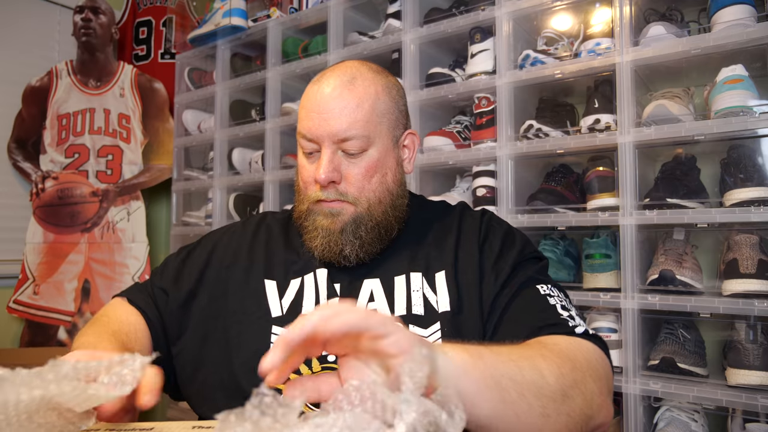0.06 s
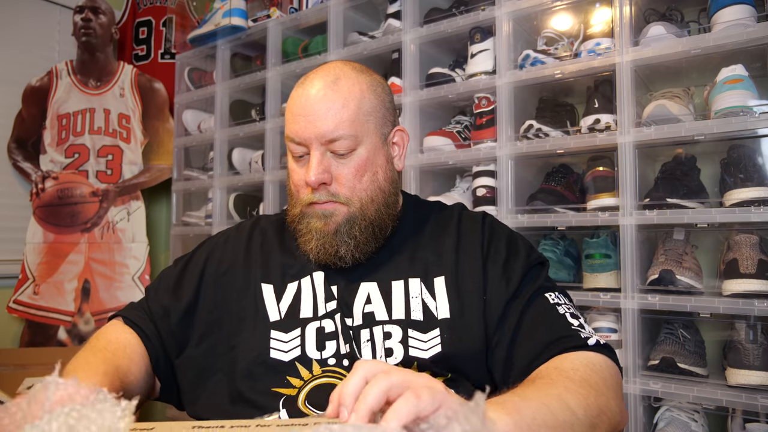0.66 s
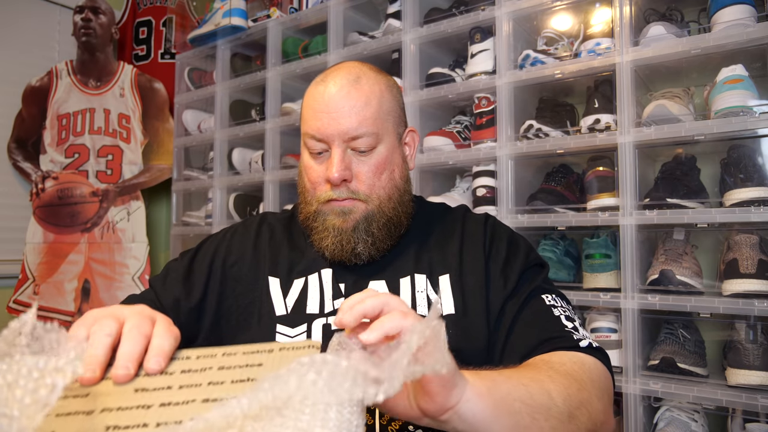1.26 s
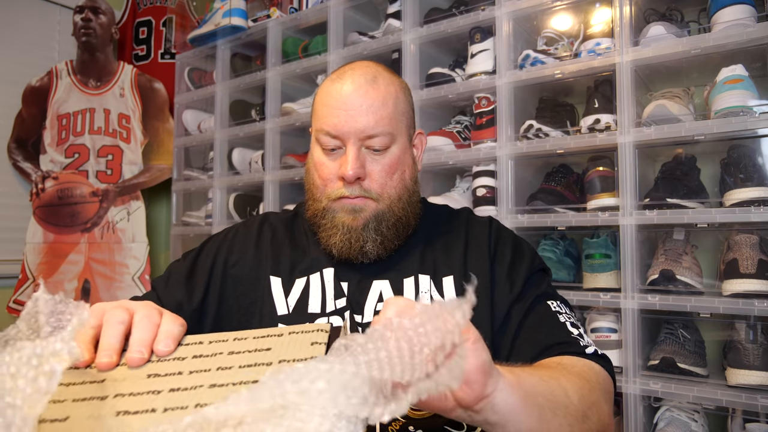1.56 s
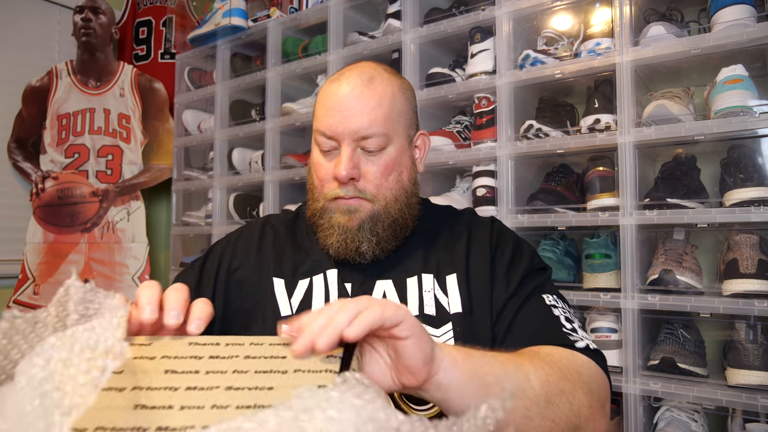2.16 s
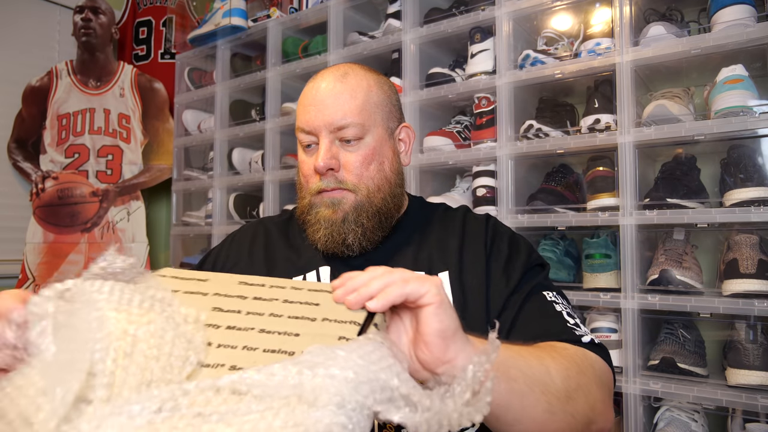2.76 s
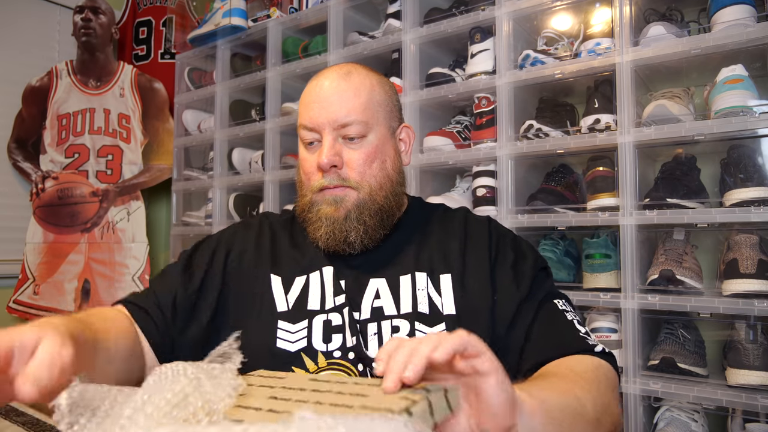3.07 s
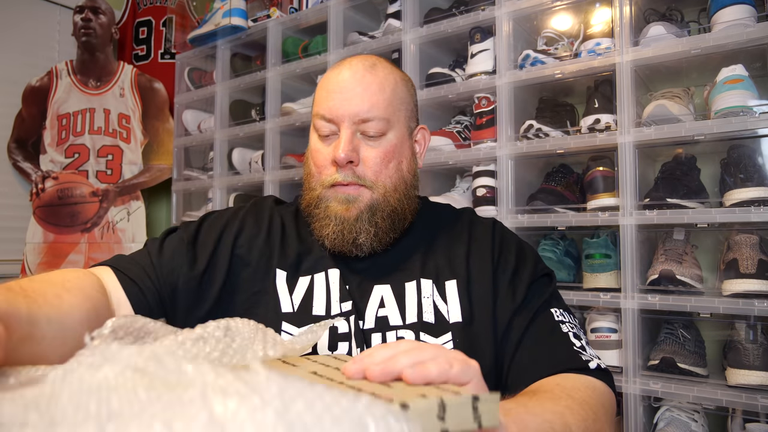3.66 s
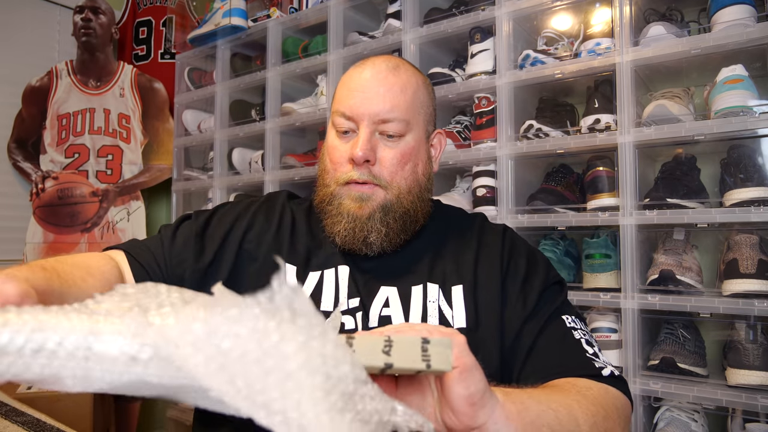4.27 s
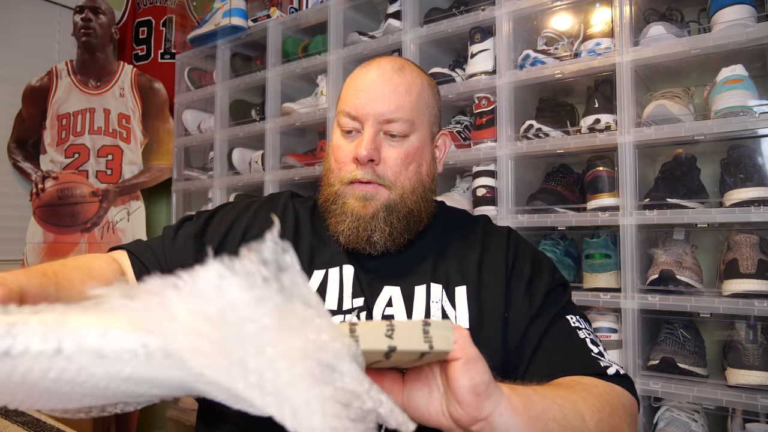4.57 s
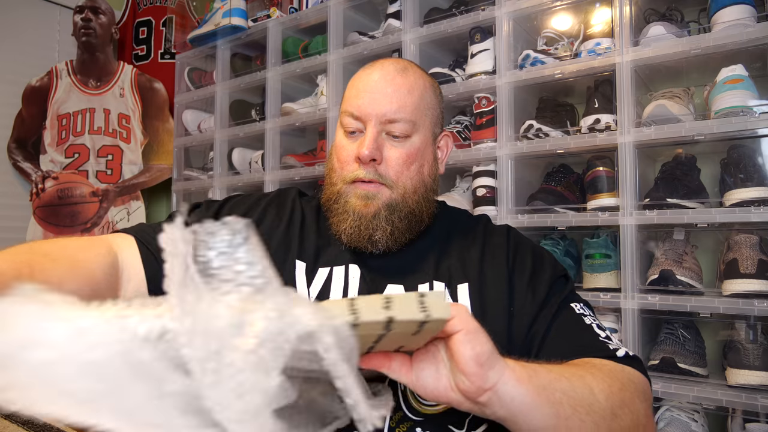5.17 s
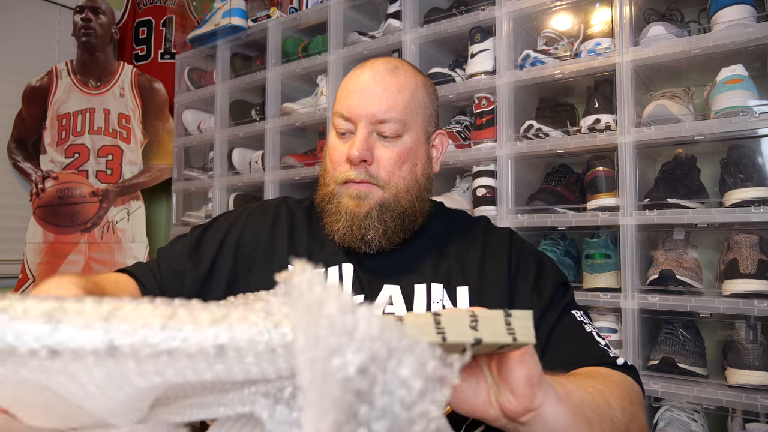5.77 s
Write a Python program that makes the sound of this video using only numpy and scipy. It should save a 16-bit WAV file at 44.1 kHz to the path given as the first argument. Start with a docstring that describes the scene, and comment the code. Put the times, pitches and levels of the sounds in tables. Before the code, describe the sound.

Bubble wrap crackles, swishes and squeaks as it is pulled off a cardboard box, with a few light knocks, close up in a small room.

```python
"""Bubble wrap is pulled off a long parcel and a cardboard box, close up in a small furnished room.
With each pull, tiny buckles and sticking contacts make the film crackle and rustle. It swishes when
tugged, creaks and squeals where it sticks and slips, and snaps where a crease gives way.
The box rings as it is knocked, the parcel thumps the table, and short reflections follow it all."""
import sys
import numpy as np
from scipy import signal
from scipy.fft import rfft, irfft
from scipy.io import wavfile

SR = 44100
rng = np.random.default_rng(int(sys.argv[2]) if len(sys.argv) > 2 else 0)


def file_out(sig):
    """Save sig as 16-bit WAV at sys.argv[1]."""
    # one column per channel
    cols = np.atleast_2d(sig).T
    # limit, then scale
    lim = np.clip(cols, -1, 1)
    pcm = np.round(lim * 32767).astype(np.int16)
    wavfile.write(sys.argv[1], SR, pcm)


N = 265036
TIME = np.arange(N) / SR


def rustle(level, treble, body, rumble_db=-10, clump_db=0.62, clump_hz=45, scrape_share=0.4):
    """Sliding wrap: clumped crackle and scrapes, brighter when fast, fuller when it drags on the box."""
    # The film's tone colour within each band. Each row: frequency in Hz, relative level in dB.
    film_colour = [(20, -10), (45, 1), (81, -0.5), (155, -2.5), (300, 1), (750, -2), (1630, -3), (2840, -5),
                   (3830, -0.5), (4930, -8.5), (7500, -13), (10000, -18), (13000, -18.5), (16000, -19.5)]
    grains = crackle(N, per_s=2200, spread_db=3.0, hiss=0.94)
    grains += scrape_share * scrapes(N, per_s=1500, decay=.0014)
    grains *= gain_of(clump_db * wander(N, clump_hz))
    # the lowest notes belong to the parcel's weight, the highest to the speed of the film
    bands = [(18, 150, body + rumble_db), (150, 850, body), (850, 5500, level), (5500, 16000, treble)]
    out = np.zeros(N)
    for low_hz, high_hz, db in bands:
        def band_gain(f):
            return gain_of(curve_at(film_colour, f)) / (1 + (low_hz / f) ** 8) / (1 + (f / high_hz) ** 8)
        out += unit_rms(coloured(grains, band_gain)) * gain_of(db)
    return out


def handling(attack_s=.012, release_s=0.029, idle_body_db=-10):
    """The hands ride the rustle's level, treble and body in dB: each pull rises, holds and dies away."""
    # The wrap never quite rests. Each row: time in seconds, idle level in dB, treble offset in dB.
    idle = [(0, -37, -5), (.14, -44.5, -4.5), (.7, -39, -5.5), (.91, -47, -4.5), (1.3, -41.5, -4.5),
            (1.6, -43.5, -2), (2.03, -41, -3.5), (2.11, -51, -5.5), (2.24, -45, -6.5), (2.35, -40.5, -4.5),
            (2.9, -43, -6), (3.25, -42.5, -5), (3.5, -39.5, -9.5), (3.89, -45, -5.5), (4.17, -40, -4),
            (4.59, -44, -3.5), (5.42, -40, -3.5), (5.72, -51.5, -2.5)]
    # Pulls draw the wrap along the parcel. Each row: start and length in seconds, level in dB,
    # treble and body offsets in dB.
    pulls = [(0.196, 0.11, -36, -8.5, -9), (0.402, .1, -38.5, -4.5, -3), (0.608, 0.046, -41, -2.5, 0.5),
             (0.73, 0.083, -34.5, -18, -7.5), (1.038, 0.091, -40, -13, -9), (1.189, 0.072, -30, -10.5, -8),
             (1.333, 0.081, -40, -7.5, -8), (1.493, 0.071, -36.5, -7.5, -5.5), (1.635, 0.27, -39, -5, -8.5),
             (2.028, 0.013, -43.5, -6, 1), (2.267, 0.055, -41, 0, -9), (2.53, 0.11, -39, -10.5, -6),
             (2.699, 0.074, -42.5, -8, -1.5), (2.951, 0.054, -45.5, -13, -2.5),
             (3.248, 0.11, -35, -9.5, -4.5), (3.546, 0.069, -36.5, -10, -8), (3.635, 0.047, -38, -4, -27),
             (3.731, 0.046, -33, -9, -9), (3.833, 0.012, -39.5, -12, -1.5), (3.951, 0.13, -38, -5, -8.5),
             (4.305, .06, -26, -16, -20.5), (4.352, 0.098, -27.5, -8, -13),
             (4.608, 0.017, -27.5, -2.5, -11), (4.742, 0.061, -40, -20, -6.5), (4.839, .095, -30, -7, -9.5),
             (5.027, 0.047, -26, -12, -18), (5.139, 0.24, -31.5, -7, -9), (5.243, 0.058, -24.5, -9.5, -8),
             (5.737, 0.17, -36.5, -8.5, -3), (5.917, 0.11, -37, -4, -9)]
    s, db, treble_db = np.transpose(idle)
    power = gain_of([np.interp(TIME, s, band) for band in (db, db + treble_db, db + idle_body_db)]) ** 2
    for s, length, db, treble_db, body_db in pulls:
        attack = np.clip((TIME - s) / attack_s, 0, 1)
        release = np.exp(-np.maximum(TIME - s - length, 0) / release_s)
        power += np.outer(gain_of([db, db + treble_db, db + body_db]), attack * release) ** 2
    return 10 * np.log10(power)


def crackle(size, per_s, spread_db, hiss):
    """Tiny buckles of the film, a few much larger than the rest, over smooth friction noise."""
    heights = gain_of(spread_db * np.minimum(rng.exponential(1, size), 4.5)) * rng.choice([-1, 1], size)
    buckles = unit_rms(heights * (rng.random(size) < per_s / SR))
    return unit_rms(buckles + hiss * rng.standard_normal(size))


def scrapes(size, per_s, decay, spread_db=3):
    """Tiny sticking contacts ring for a few milliseconds, each at a pitch of its own."""
    when, pitch, chance, phase = rng.random((int(per_s * size / SR), 4)).T[:, :, None]
    hz = 500 + 15000 * pitch ** 1.5
    step = np.arange(384)
    age = step / SR / decay
    strength = gain_of(spread_db * np.minimum(-np.log(1 - chance), 3))
    grains = strength * age * np.exp(-age) * np.sin(2 * np.pi * (hz * step / SR + phase))
    positions = (when * size).astype(int) + step
    return unit_rms(np.bincount(positions.ravel(), grains.ravel(), size)[:size])


def swishes(trim_db=-1, skirt=1.7, low_cut_hz=250):
    """Each tug swells and fades as a dense burst of tiny slips around one broad resonance."""
    # Tugs of film over film. Each row: peak time, rise and fall in seconds, level before trim in dB,
    # centre in Hz, width in octaves.
    tugs = [(.016, .0067, 0.0075, -23, 1680, 1.1), (.2606, 0.00099, .006, -26, 4470, 1.4),
            (.486, 0.025, 0.019, -32.5, 1040, 1.7), (.615, 0.024, 0.031, -28, 1860, 0.87),
            (.648, 0.019, .013, -28.5, 1200, 1.5), (1.227, 0.024, 0.046, -24.5, 1660, 1.6),
            (1.681, 0.036, 0.17, -32.5, 3060, 1.7), (1.872, 0.021, 0.019, -23.5, 2820, 1.46),
            (2.66, 0.0029, 0.013, -28.5, 1390, 0.63), (3.555, 0.004, 0.026, -22, 2500, 1.06),
            (4.07, .005, 0.043, -23.5, 3340, 0.68), (4.336, 0.015, 0.037, -24, 2140, .98),
            (4.373, .012, .023, -20.5, 2600, 1.14), (4.62, 0.004, 0.0081, -22, 4040, 3),
            (4.902, .014, 0.033, -19, 2900, 1.9), (5.037, 0.0032, 0.015, -16, 4740, 0.95),
            (5.06, .02, 0.029, -13.5, 3500, 0.98), (5.285, 0.031, 0.088, -25, 1950, 1.56),
            (5.849, .047, 0.13, -31, 1280, 2), (6.005, 0.02, .022, -24, 2580, 2)]
    out = np.zeros(N)
    for s, rise, fall, db, hz, octaves in tugs:
        t = np.arange(16384) / SR - 2.5 * rise
        slips = shifting_creases(crackle(len(t), per_s=1500, spread_db=3.0, hiss=0.61), depth_db=4)
        burst = coloured(slips, lambda f: bell(f, hz, octaves) ** skirt / np.hypot(1, low_cut_hz / f))
        swell = np.exp(-np.where(t < 0, (t / rise) ** 2, t / fall))
        add(out, s + t[0], gain_of(db + trim_db) * unit_rms(burst) * swell)
    return out


def shifting_creases(x, depth_db):
    """Shifting creases make the film ring briefly at ever new pitches."""
    spectra = signal.stft(x, nperseg=256, noverlap=192)[2]
    patch = np.outer(np.hanning(6), np.hanning(9))  # one ring's spread in pitch and time
    patches = signal.convolve2d(rng.standard_normal(spectra.shape), patch, "same")
    spectra *= gain_of(depth_db * unit_rms(patches))
    return unit_rms(signal.istft(spectra, nperseg=256, noverlap=192)[1][:len(x)])


def creaks(fade_db=4, decay_cycles=0.37, jitter=0.084):
    """Stick and slip: a short train of like flicks whose rate follows the pull."""
    # Sticking film lets go. Each row: start and length in seconds, first and last rate in slips
    # per second, typical opening peak in dB, ring in Hz.
    slip_runs = [(.2832, 0.012, 1110, 480, -6.5, 3480), (0.603, 0.023, 210, 190, -25, 1890),
                 (0.7318, 0.025, 535, 680, -7.5, 1800), (0.763, 0.0067, 410, 140, -10.5, 2140),
                 (0.8027, 0.0027, 630, 980, -12, 1800), (1.22, 0.046, 170, 250, -13, 2190),
                 (4.308, 0.008, 340, 430, -15, 3250), (4.4275, .043, 150, 165, -9, 3880),
                 (5.2555, 0.022, 285, 170, -10.5, 3300)]
    out = np.zeros(N)
    for s, length, first_rate, last_rate, db, hz in slip_runs:
        at = 0
        for gap, scatter_db in rng.standard_normal((40, 2)):
            if at < length:
                strength = gain_of(db - fade_db * at / length + scatter_db)
                add(out, s + at, -strength * flick(hz, decay_cycles / hz))
                at += np.exp(jitter * gap) / (first_rate + (last_rate - first_rate) * at / length)
    return out


def squeals(overtone_db=-12, waver=0.18, waver_hz=900):
    """Slips fast enough to fuse into a gliding tone, unsteady in pitch and strength."""
    # Film squeals on film. Each row: start and length in seconds, first, middle and last pitch in Hz,
    # level in dB, roughness from 0 to 1.
    glides = [(1.817, .015, 7200, 7500, 7550, -36, .3), (1.877, 0.014, 3620, 3550, 3880, -21, .48),
              (2.296, .027, 2570, 2080, 1510, -27.5, .22), (2.316, .01, 1630, 2140, 3100, -30, 0.15),
              (2.328, 0.017, 4730, 3980, 3840, -26.5, .42), (3.379, 0.027, 4890, 3570, 2880, -32, 0.76),
              (3.54, 0.024, 3030, 2980, 2970, -27.5, 0.45), (4.064, 0.0086, 3750, 3620, 3550, -22.5, 0.23),
              (4.07, 0.053, 2840, 2950, 2850, -32, 0.3), (4.897, 0.0062, 2230, 2290, 2480, -17.5, .26),
              (4.907, 0.013, 7300, 6420, 6100, -25, .37), (5.027, 0.015, 5920, 4650, 3900, -26, 0.53),
              (5.045, 0.024, 3975, 3550, 3330, -15.5, 0.31), (5.373, .0085, 2060, 2120, 2000, -23.5, 0.38)]
    out = np.zeros(N)
    for s, length, first, middle, last, db, rough in glides:
        size = int(length * SR)
        sway, flutter = (wander(4096, waver_hz)[:size] for _ in range(2))
        hz = np.interp(np.linspace(0, 1, size), [0, .5, 1], [first, middle, last])
        phase = 2 * np.pi * np.cumsum(hz * (1 + waver * rough * sway)) / SR
        tone = sum(gain_of(overtone_db * k) * np.sin((k + 1) * phase) for k in range(3))
        squeal = unit_rms(tone * (1 + rough * flutter))
        add(out, s, gain_of(db) * squeal * signal.windows.tukey(size, .5))
    return out


def snaps(level, trim_db=-2, crack_share=0.42):
    """A crease gives way: one drooping flick with a sharp, wide crack on it."""
    # The larger creases. Each row: start in seconds, flick peak before trim in dB, ring in Hz,
    # decay in seconds.
    large_snaps = [(0.0374, -25, 3020, 0.00064), (0.1257, -21.5, 1060, 0.00093),
                   (.221, -22.5, 1100, 0.0013), (.262, -20, 4400, .0008), (0.4214, -18.5, 1960, 0.00051),
                   (0.4468, -7.5, 2490, 0.00027), (1.1041, -11.5, 3370, 0.000053),
                   (1.119, -15, 3080, 0.000091), (1.1317, -12, 2800, 0.00023), (1.1916, -9, 2410, 0.00041),
                   (1.1915, -28, 9900, .0003), (1.205, -17, 2240, 0.00027), (1.492, -10, 9460, 0.00041),
                   (1.492, -9, 2980, 0.00063), (1.4921, -5, 1360, 0.00057), (2.241, -23, 1920, 0.00092),
                   (2.2515, -6.5, 980, 0.00054), (2.657, -23, 1800, 0.00084), (3.043, -24, 2300, 0.00061),
                   (3.34, -21, 1470, 0.00051), (3.4727, -25, 3200, .00045), (3.5205, -24.5, 2370, .0015),
                   (3.7098, -14.5, 2900, 0.00042), (3.7427, -8, 2130, 0.00042), (3.797, -24, 1560, .0017),
                   (4.3243, -1, 1850, 0.000626), (4.326, -8, 930, 0.00052), (4.528, -24.5, 2350, .0012),
                   (4.839, -20, 3600, .001), (4.8987, -14, 2550, 0.00084), (5.282, -7, 3770, 0.00052),
                   (5.2839, -4.5, 910, 0.00069), (5.2987, -11.5, 2380, 0.0013),
                   (5.3689, -11.5, 1590, 0.00074)]
    out, t = np.zeros(N), np.arange(1024) / SR
    for s, db, hz, decay in large_snaps + stray_snaps(level):
        noise = unit_rms(coloured(rng.standard_normal(len(t)), lambda f: bell(f, hz, octaves=1)))
        crack = crack_share * noise * np.exp(-(t / (3 * decay)) ** 2)
        strength = gain_of(db + trim_db)
        add(out, s, strength * flick(hz, decay, droop=0.46))
        add(out, s, strength * crack)
    return out


def stray_snaps(level, per_s=7.8, lift_db=7, spread_db=2.5, ring_hz=2520, octaves=0.29, decay_s=.000455):
    """Rows for snaps(): small creases give way at random, as strongly as the wrap is being moved."""
    count = int(per_s * N / SR)
    at = rng.integers(0, N, 512)[:count]
    size, pitch = rng.standard_normal((512, 2))[:count].T
    hz = ring_hz * 2 ** (octaves * np.clip(pitch, -2, 2))
    return list(zip(TIME[at], level[at] + lift_db + spread_db * size, hz, np.full(count, decay_s)))


def flick(hz, decay, droop=0):
    """A patch flips over: a few cycles that swell and die."""
    age = np.arange(1, int(12 * decay * SR) + 4) / SR / decay
    # short bending waves travel fastest, so the pitch can droop
    phase = 2 * np.pi * np.cumsum(hz * ((age + .5) / 2) ** -droop) / SR
    pressure = np.gradient(age * np.exp(-age) * np.sin(phase - np.interp(1, age, phase)))
    return pressure / abs(pressure).max()


def box_knocks(trim_db=-1, scuff_decay_s=0.017, low_cut_hz=320, contact_s=0.00029):
    """Blows ring the cardboard panel, less so where a hand damps it, and scuff its face."""
    # Blows on the box. Each row: start in seconds, ring gain in dB, hardness as a corner in Hz,
    # factors on the panel's pitch and ring time, scuff gain in dB.
    knocks = [(0.1731, -28.5, 2150, 0.96, 1.8, -29), (0.4452, -18.5, 1500, 0.71, 0.31, -17.5),
              (1.4915, -15.5, 1330, 1.003, 1, -20.5), (2.2494, -23.5, 1820, 1.13, 0.94, -19),
              (3.9906, -23, 1120, 1.245, 0.2, -21.5), (5.2838, -9, 1390, 0.95, 0.24, -20)]
    # The panel's modes. Each row: base pitch in Hz, relative level in dB, base T60 in seconds.
    panel_modes = [(230, -10, 0.072), (326, -8, 0.11), (400, -12, 0.054), (500, -5.5, 0.051),
                   (587, 3, 0.095), (637, -9.5, 0.13), (708, -12, 0.083), (915, -21, 0.097),
                   (1240, 7, 0.024), (1410, -19, 0.025), (2010, -6, 0.08)]
    out, t = np.zeros(N), np.arange(SR // 4) / SR
    for s, ring_db, corner_hz, pitch, sustain, scuff_db in knocks:
        ring = np.zeros(len(t))
        for k, (hz, db, t60) in enumerate(panel_modes):
            envelope = gain_of(db - 60 * t / (t60 * sustain)) / np.hypot(1, hz / corner_hz)
            ring += (-1) ** k * envelope * np.sin(2 * np.pi * hz * pitch * t)
        noise = rng.standard_normal(len(t))
        scuff = unit_rms(coloured(noise, lambda f: 1 / (1 + (f / corner_hz) ** 3 + (low_cut_hz / f) ** 2)))
        blow = gain_of(ring_db) * ring + gain_of(scuff_db) * scuff * np.exp(-t / scuff_decay_s)
        add(out, s, gain_of(trim_db) * blow * (1 - np.exp(-t / contact_s)))
    return out


def table_thumps(trim_db=-1):
    """The parcel bumps the table: each contact is one low, dull pulse."""
    # Each row: start in seconds, peak before trim in dB, pitch in Hz, decay in seconds.
    bumps = [(0.217, -24, 74, 0.0031), (.68, -53, 80, .015), (2.254, -26, 62.6, 0.0052),
             (3.169, -43, 45, 0.015), (3.274, -30.5, 42, 0.017), (3.294, -40, 103, 0.0089),
             (3.99, -26, 176, 0.0034), (4.093, -39.5, 145, 0.014), (5.821, -40, 83.5, 0.02)]
    out = np.zeros(N)
    for s, db, hz, decay in bumps:
        add(out, s, gain_of(db + trim_db) * flick(hz, decay))
    return out


def room(x, first_echo_s=0.0028, echoes_per_s=3000):
    """Sparse reflections from table, shelves and walls, each band dying at its own speed."""
    # The room's decay. Each row: frequency in Hz, T60 in seconds.
    decay_times = [(100, 0.28), (500, 0.27), (2000, 0.059), (4000, 0.053), (8000, 0.031), (16000, 0.19)]
    # The tone of the reflections. Each row: frequency in Hz, relative level in dB.
    echo_colour = [(60, -20), (600, 6.5), (2500, -7), (3700, -1.5), (4700, -9), (16000, 14)]
    size = SR // 2
    echoes = rng.choice([-1., 1.], size) * (rng.random(size) < echoes_per_s / SR)
    echoes *= np.arange(size) / SR > first_echo_s
    hz, t, spectra = signal.stft(echoes, SR, nperseg=256)
    tail_db = curve_at(echo_colour, hz)[:, None] - 60 * t / curve_at(decay_times, hz)[:, None]
    tail = signal.istft(spectra * gain_of(tail_db), SR, nperseg=256)[1]
    return signal.fftconvolve(x, tail / np.linalg.norm(tail))[:N]


def gain_of(db):
    """Decibels to amplitude."""
    return 10 ** (np.asarray(db) / 20)


def unit_rms(x):
    """Scales to an rms of one."""
    return x / np.sqrt(np.mean(x ** 2) + 1e-20)


def curve_at(points, hz):
    """Interpolates a table over log frequency."""
    f, value = np.transpose(points)
    return np.interp(np.log(hz + 1), np.log(f + 1), value)


def bell(f, hz, octaves):
    """Gain of a broad resonance at hz, halved that many octaves to either side."""
    return 1 / (1 + (np.log2(f / hz) / octaves) ** 2)


def add(mix, s, sound):
    """Mixes a sound in at s seconds."""
    part = mix[max(round(s * SR), 0):][:len(sound)]
    part += sound[:len(part)]


def coloured(x, gain):
    """Filters x by a gain that is a function of frequency."""
    return irfft(rfft(x) * gain(np.fft.rfftfreq(len(x), 1 / SR) + 1), len(x))


def wander(size, hz):
    """Smooth random drift of rms one, rolling off above hz."""
    return unit_rms(coloured(rng.standard_normal(size), lambda f: np.exp(-(f / hz) ** 2)))


def scene(wet_db=-10, side_db=-20, side_hz=1200, bass_db=26, bass_hz=70):
    """Everything sits in the centre, with a faint stereo spread, mostly in the bass."""
    level, treble, body = handling()
    wrap = rustle(level, treble, body) + swishes() + creaks() + squeals() + snaps(level)
    near = wrap + box_knocks() + table_thumps()
    middle = near + gain_of(wet_db) * room(near)
    side = coloured(room(near),
                    lambda f: gain_of(side_db + bass_db / (1 + f / bass_hz)) / (1 + f / side_hz) ** .4)
    return np.array([middle + side, middle - side])


def record(dry):
    """Peaks clip at full scale, then a steep low-pass takes off the very top."""
    low_pass = signal.firwin(511, cutoff=15900, window=("kaiser", 9), fs=SR)
    return signal.oaconvolve(np.clip(dry, -1, 1), low_pass[None], "same")


dry = scene()
out = record(dry)
file_out(out)
```